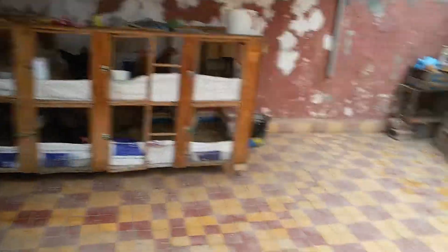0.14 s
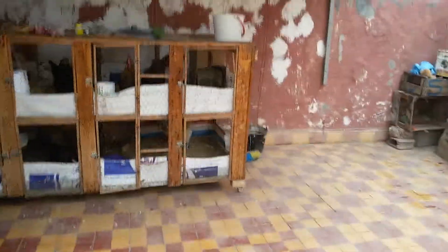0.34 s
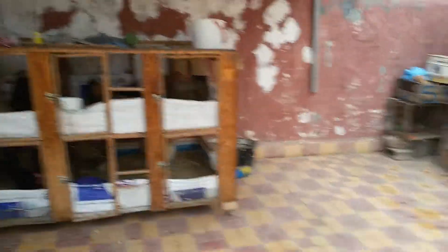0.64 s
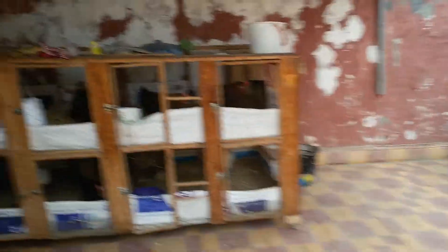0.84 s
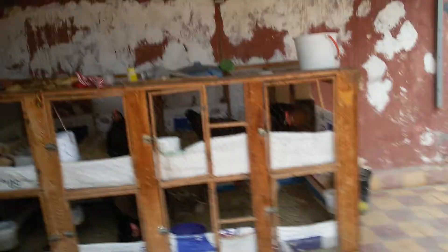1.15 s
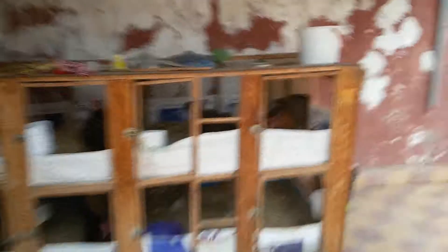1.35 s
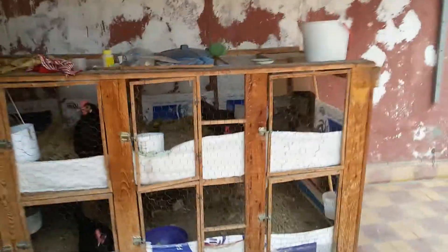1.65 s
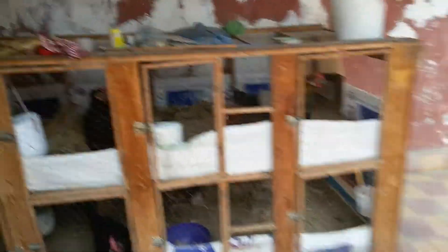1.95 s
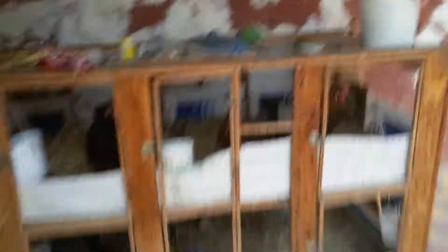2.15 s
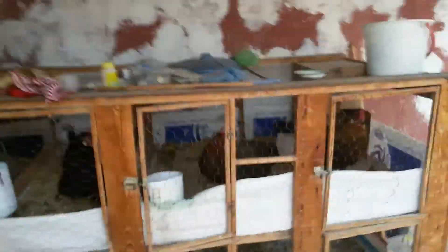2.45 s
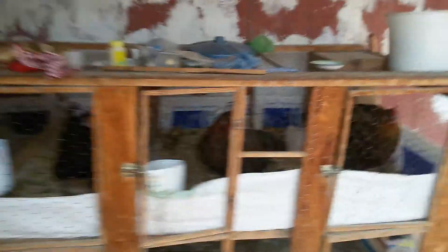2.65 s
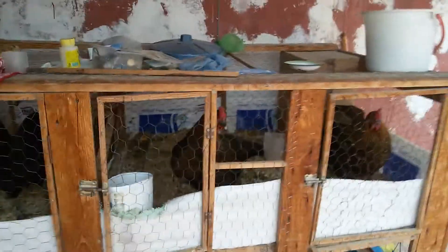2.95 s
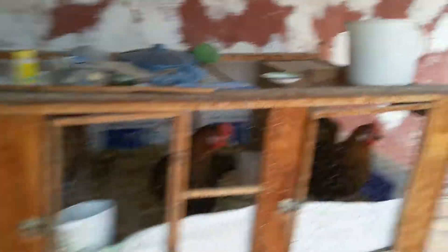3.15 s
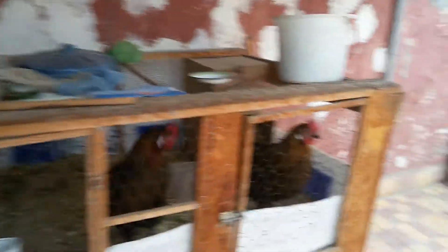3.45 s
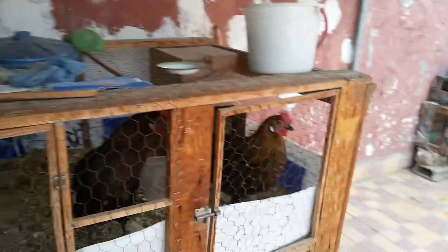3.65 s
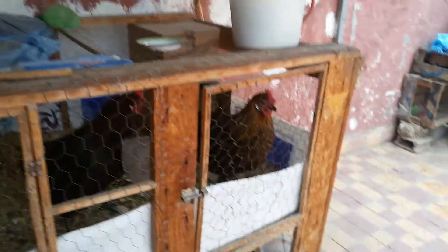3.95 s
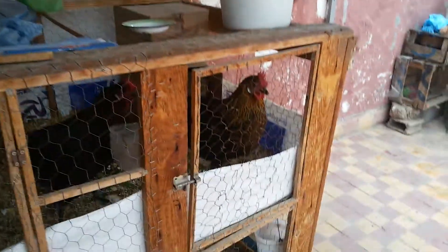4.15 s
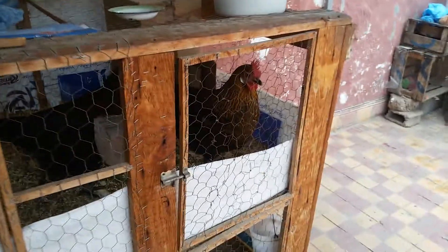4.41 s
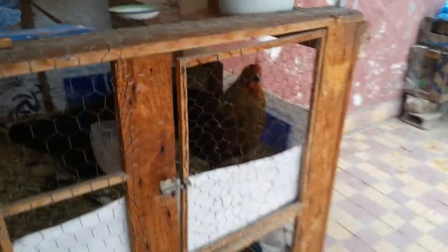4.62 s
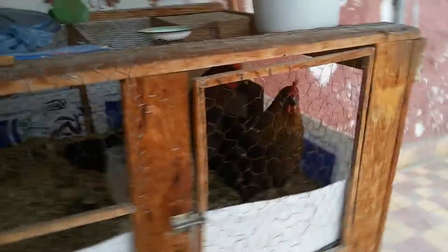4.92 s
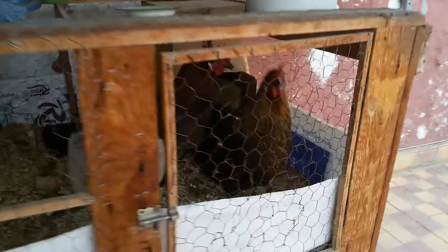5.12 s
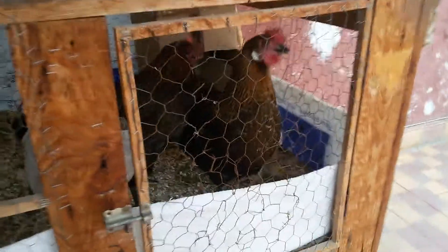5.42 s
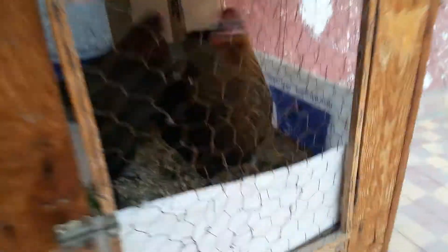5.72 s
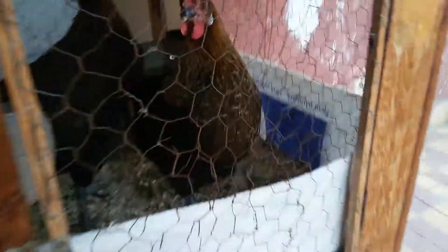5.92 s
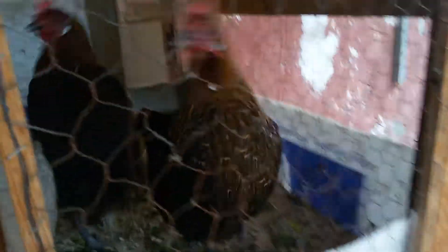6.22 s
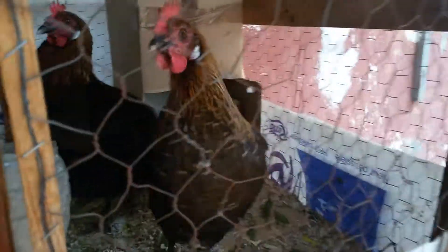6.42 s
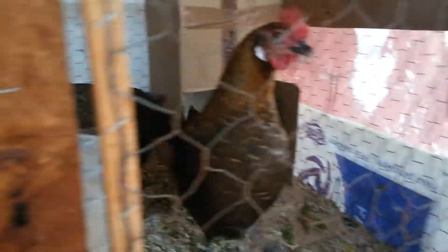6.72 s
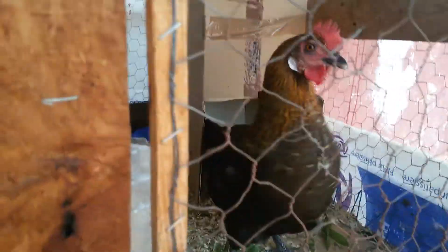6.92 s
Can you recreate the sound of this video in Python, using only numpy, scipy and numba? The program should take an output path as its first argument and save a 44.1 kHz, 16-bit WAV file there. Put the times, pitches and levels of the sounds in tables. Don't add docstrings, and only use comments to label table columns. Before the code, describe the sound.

A hen's nasal, raspy caws repeat about every three quarters of a second, long and short, each sliding upward and growing louder overall. Low throaty mutters and a small hum come midway, with gritty straw scratches, wire ticks and thuds. Short echoes come from boards and yard walls. Behind are a thin wavering tool whine, faint insect chirr and soft traffic rumble.

```python
import sys
import numpy as np
from scipy import signal
from scipy.io import wavfile
from scipy.ndimage import uniform_filter1d
from numba import njit

SR = 44100
rng = np.random.default_rng(int(sys.argv[2]) if len(sys.argv) > 2 else 0)


def digitize_waveform(pressure):
    field = np.atleast_2d(pressure).T
    bounded = np.clip(field, -1, 1)
    quanta = np.round(bounded * 32767).astype(np.int16)
    wavfile.write(sys.argv[1], SR, quanta)


def linear_from_db(decibels):
    return 10 ** (np.asarray(decibels, float) / 20)


N = 311771
T = np.arange(N) / SR


def unit(x):
    return x / np.sqrt(np.mean(x ** 2))


@njit
def svf(x, hz, width):
    y, b, l = np.empty(len(x)), 0., 0.
    for i in range(len(x)):
        g, k = np.tan(np.pi * hz[i] / SR), width / hz[i]
        v = (b + g * (x[i] - l)) / (1 + g * (g + k))
        b, l, y[i] = 2 * v - b, l + 2 * g * v, k * v
    return y


def band(x, hz, width):
    return svf(x, hz + np.zeros(len(x)), 1. * width)


def band_twice(x, hz, width):
    return unit(band(band(x, hz, width), hz, width))


def walk(rate, size=N):
    k = max(int(SR / rate), 1)
    held = np.repeat(rng.standard_normal(size // k + 1), k)
    return 1.4 * uniform_filter1d(uniform_filter1d(held, k), k)[:size]


def span(s, length, rise_s, fall_s):
    at = slice(int(s * SR), int((s + length) * SR))
    t = T[at] - s
    return at, np.clip(np.minimum(t / rise_s, (length - t) / fall_s), 0, 1), t


def unroll(rows, rise_s, fall_s):
    s, *columns = np.transpose(rows)
    at, gate, _ = span(s[0], s[-1] - s[0], rise_s, fall_s)
    return at, gate, [np.interp(T[at], s, c) for c in columns]


def colour(points, hz):
    points = np.array(points)
    return np.interp(np.log(hz), np.log(points[:, 0]), points[:, 1])


def bumps(rows):
    t = T[::32]
    curve = sum(size * np.exp(-(2.74 * (t - s) / length) ** 2) for s, size, length in rows)
    return np.interp(T, t, curve)


def caws(wobble=0.002965, rasp=0.0066, flutter_db=2.0, breath_db=-21):
    # start in seconds, length in seconds, first pitch in Hz, top pitch in Hz,
    # share of the call spent climbing (0 to 1).
    calls = [
        (0.518, 0.56, 520, 536.4, 0.89),
        (1.292, 0.21, 503.5, 537.5, 0.81),
        (2.021, 0.46, 503.5, 617, 0.95),
        (2.796, 0.53, 521.8, 594.8, 1),
        (3.514, 0.2, 551.5, 583, 0.91),
        (4.12, 0.59, 532, 590.4, 0.82),
        (4.96, .358, 538.2, 593.7, .65),
        (5.559, 0.29, 534.6, 578, 0.72),
        (6.149, 0.47, 533, 589.5, 0.55),
    ]
    # 2nd harmonic in dB, fundamental in dB, 3rd-4th in dB, beak ring in dB,
    # swell gained on the climb in dB.
    voices = [(-38.5, -40.5, -44, -58, 6), (-32, -40, -39.5, -49, 12), (-28.5, -34, -40.5, -45, 5.5),
              (-29.5, -36, -36, -45.5, 1.5), (-24.5, -41.5, -30, -39, 8), (-23, -34.5, -29.5, -33, 10.5),
              (-22.5, -31.5, -28.5, -33, 4.5), (-28, -34.5, -28.5, -32, 4), (-21.5, -34, -25, -31, 3)]
    # 4th over 3rd harmonic in dB at first, the same at full effort,
    # half-pitch lines in dB at full effort.
    beaks = [(-13, 0.5, -11), (-11, -10, -11), (-2, -3.5, -12.5), (-6.5, 1, -6), (-1.5, -3, -18),
             (-5, -0.5, -14), (-3, 0.5, -16), (-0.5, 1.5, -15.5), (-0.5, 5, -18.5)]
    # pitch in Hz, level in dB.
    throat = [(500, 1), (1100, -0.5), (1650, -2), (2300, -1.5), (2900, -20), (3250, -12), (3520, -4),
              (3850, 1.5), (4200, -13), (4750, -7.5), (5300, -27), (6500, -23), (8000, -29.5),
              (9800, -25.5)]
    # pitch in Hz, level in dB.
    half_lines = [(800, -15), (1400, 5.5), (2000, -2), (2700, 4), (3700, 8), (5000, 1)]
    # time in seconds, change in dB, length in seconds.
    catches = [(0.557, -19, 0.029), (0.674, 8, 0.13), (0.844, 0, 0.0084), (0.928, -24, 0.01),
               (0.985, -27, 0.044), (1.324, -15, 0.011), (1.448, -15, 0.033), (2.083, -15, 0.01),
               (2.382, -11.5, 0.052), (2.845, -35, .04), (2.93, -6, 0.12), (3.018, 7.5, 0.063),
               (3.098, -3, .035), (3.141, -23, 0.018), (3.545, -24, 0.012), (3.583, 5.5, 0.037),
               (3.598, -17, .014), (4.19, -21, .016), (4.406, 7, 0.13), (4.478, -3, 0.032),
               (4.637, -2, 0.086), (4.999, -19, .014), (5.067, -6.5, 0.096), (5.152, -8, 0.037),
               (5.233, 5, 0.11), (5.795, -24, 0.058), (6.187, -14.5, 0.0067), (6.308, -6.5, 0.13),
               (6.357, -14, 0.029), (6.474, -26, .025)]
    # time in seconds, change in Hz, length in seconds.
    slips = [(.6, -8.5, 0.041), (2.11, 13.5, 0.13), (2.23, -10, 0.078), (2.365, -16.5, 0.058),
             (2.89, -9.5, 0.15), (3.07, 14.5, 0.052), (3.3, 38.5, 0.024), (3.54, -14.5, .04),
             (3.576, 13, 0.038), (3.706, 39, 0.022), (4.155, -12, 0.043), (4.46, -12, .08), (4.53, 5, .06),
             (5.18, 8, 0.029), (5.795, -9.5, 0.032), (6.476, -16.5, 0.026)]
    catch_share = 0.19
    out = np.zeros(N)
    catch_db, slip_hz = bumps(catches), bumps(slips)
    for (s, length, *pitch), voice, beak in zip(calls, voices, beaks):
        at, gate, t = span(s - .004, length + 0.0037, rise_s=0.0093, fall_s=0.027)
        hz, db, low_db, mid_db, beak_db, open_db, half_db = effort(t, length, *pitch, voice, beak)
        low_db = low_db + catch_share * catch_db[at]
        mid_db = mid_db + catch_share * catch_db[at]
        lines_db = {1: low_db, 2: db + catch_db[at], 3: mid_db - open_db / 2, 4: mid_db + open_db / 2}
        size = len(gate)
        unsteady = 1 + wobble * walk(51.45, size) + rasp * walk(250.5, size)
        phase = 2 * np.pi * np.cumsum((hz + slip_hz[at]) * unsteady) / SR
        call = 0
        for k in np.arange(2, 35) / 2:
            line_db = lines_db.get(k, mid_db if k < 5 else beak_db) + colour(throat, k * hz)
            if k % 1:
                line_db = line_db + half_db + colour(half_lines, k * hz)
            flicker_db = flutter_db * (k != 2) * walk(35, size)
            flicker_db = flicker_db + np.clip(.8 * (k - 3), 1.2, 2.6) * walk(110, size)
            line = np.sqrt(2) * np.cos(k * phase + 1.2 * rng.standard_normal())
            call = call - linear_from_db(line_db + flicker_db) * line
        air = rng.standard_normal(size) * (1 + np.cos(phase))
        breath = linear_from_db(breath_db + db) * unit(band(air, 1330, 510))
        beak_air = band_twice(air, 4200, 1600) + linear_from_db(-7) * unit(band(air, 7200, 3500))
        out[at] += gate * (call + breath + linear_from_db(beak_db - 6) * beak_air)
    return out


def effort(t, length, first_hz, top_hz, climb, voice, beak):
    swell_shares = (.6, 0.74, 0.85, 1.06)
    full_db, low_db, mid_db, beak_db, swell_db = voice
    first_open_db, open_db, half_db = beak
    push = np.clip(t / (climb * length), 0, 1)
    sharp_hz = 59 * np.exp(-t / 0.00559)
    sag_hz = 15.4 * np.exp((t - length) / 0.012)
    hz = first_hz + (top_hz - first_hz) * push + sharp_hz - sag_hz
    low, full, mid, ring = (-share * swell_db * (1 - push) for share in swell_shares)
    coop_hz, coop_width_hz, coop_db = 1214, 78, 6
    coop_boost = coop_db * np.exp(-((2 * hz - coop_hz) / coop_width_hz) ** 2)
    hard_db = 7 * np.exp(-t / 0.03)
    ring_db = beak_db + ring + 3.5 * np.exp(-t / 0.055)
    open_db = first_open_db + (open_db - first_open_db) * push
    open_db = open_db + 6 * np.exp(-t / 0.088) + 7.5 * walk(24.84, len(t))
    half_db = half_db - 4.5 * (1 - push) + 1.5 * walk(5.6, len(t))
    return hz, full_db + full + coop_boost + hard_db, low_db + low, mid_db + mid, ring_db, open_db, half_db


def grumbles(throat_width=330):
    # start in seconds, length in seconds, first pitch in Hz, last pitch in Hz, level in dB.
    mutters = [(0.291, 0.095, 259.7, 274, -43), (1.281, 0.15, 230.7, 229.6, -41),
               (1.435, 0.15, 258, 268.5, -36.5), (1.654, 0.071, 233, 281, -37),
               (1.83, 0.11, 230, 275, -38.5), (2.841, 0.34, 238.6, 266.8, -40),
               (3.243, 0.12, 271, 297.7, -30), (3.33, 0.21, 314, 300, -30), (3.516, .16, 250, 275.4, -33),
               (3.755, 0.15, 223.5, 309, -32), (3.892, .08, 319.4, 388, -34.5)]
    out = np.zeros(N)
    for s, length, first_hz, last_hz, db in mutters:
        at, gate, t = span(s, length, rise_s=0.006, fall_s=0.024)
        hz = first_hz + (last_hz - first_hz) * t / length
        throat_hz = 472 + 1.036 * hz
        rough = np.clip(.42 - .65 * np.log2(last_hz / first_hz), .05, 1)
        size = len(gate)
        cycles = np.cumsum(hz * (1 + 0.11 * rough * walk(120, size))) / SR
        pulses = np.exp(-(cycles % 1) / .12) * linear_from_db(4 * rough * walk(70, size))
        breath = unit(pulses * rng.standard_normal(size))
        source = unit(pulses - pulses.mean()) + 2.5 * rough * breath
        voice = band_twice(source, throat_hz, throat_width)
        chest = linear_from_db(-4 - 17 * rough) * band_twice(source, hz, 90)
        out[at] += gate * linear_from_db(db) * (voice + chest)
    return out


def hum():
    # time in seconds, pitch in Hz, level in dB.
    glide = [
        (2.96, 496, -40),
        (2.99, 486, -39.5),
        (3.134, 481, -40.5),
        (3.19, 501, -43),
        (3.244, 526, -36.5),
        (3.3, 515, -35),
    ]
    throat_hz, octave_db, fall_db_per_hz = 968, 1.5, .28
    out = np.zeros(N)
    at, gate, (hz, low_db) = unroll(glide, rise_s=.02, fall_s=.03)
    high_db = low_db + octave_db - fall_db_per_hz * np.abs(2 * hz - throat_hz)
    phase = 2 * np.pi * np.cumsum(hz) / SR
    out[at] = gate * np.sqrt(2) * (linear_from_db(low_db) * np.sin(phase) + linear_from_db(high_db) * np.sin(2 * phase))
    return out


def litter():
    # middle in seconds, level in dB, length in seconds, centre in Hz.
    scratches = [(0.278, -38.5, 0.031, 4700), (0.326, -44, 0.035, 4800), (0.38, -32, 0.0028, 3820),
                 (0.653, -47, 0.024, 5500), (0.916, -42.5, 0.059, 4193), (1.017, -41, .015, 4800),
                 (1.202, -41, 0.015, 4300), (1.457, -42, 0.02, 4020), (1.688, -40.5, 0.1, 4360),
                 (1.92, -37.5, 0.052, 4300), (2.368, -42, 0.01, 4500), (2.642, -50, 0.058, 4940),
                 (2.881, -30.5, 0.044, 4100), (2.942, -34, 0.0091, 4000), (3.084, -54, 0.013, 4200),
                 (3.232, -30.5, 0.029, 4000), (3.665, -37, 0.011, 4500), (3.96, -41.5, 0.05, 4530),
                 (4.305, -35, 0.024, 4170), (5.443, -43.5, 0.049, 4250), (5.718, -30.5, 0.047, 4340),
                 (5.773, -30, 0.065, 4160), (6.3, -37.5, 0.16, 5200), (6.783, -34, 0.016, 4860),
                 (6.812, -34.5, 0.028, 4560), (6.847, -44, 0.061, 4660)]
    # start in seconds, peak in dB, low part in dB beside it, top part in dB beside it.
    ticks = [
        (0.5934, -32, 13.5, -22),
        (2.617, -36, 0, -40),
        (6.0302, -23.5, -6, -34),
        (6.3446, -22, -11, -25),
        (7.002, -27.5, -19, -25),
    ]
    # start in seconds, level in dB, pitch in Hz, time to fade 60 dB in seconds.
    thuds = [
        (2.918, -29, 96.5, 0.25),
        (3.944, -17, 198, 0.042),
        (6.31, -21.5, 223, 0.028),
    ]
    # middle in seconds, level in dB, length in seconds.
    chirrs = [
        (0.055, -41, 0.17),
        (1.354, -40.5, 0.48),
        (2.886, -33, 0.046),
        (5.417, -42, 0.3),
        (6.8, -32.5, 0.069),
    ]
    out = np.zeros(N)
    grit = rng.standard_normal(N) * linear_from_db(2.7 * walk(400))
    for s, db, length, hz in scratches:
        at = slice(int((s - 2 * length) * SR), int((s + 2 * length) * SR))
        swell = np.exp(-(2 * (T[at] - s) / length) ** 2)
        out[at] += linear_from_db(db) * swell * band_twice(grit[at], hz, 3200)
    t = T[:4000]
    for s, db, low_db, top_db in ticks:
        snap = rng.standard_normal(len(t)) * (np.exp(-t / 0.0046) + 0.12 * np.exp(-t / 0.035))
        tick = band(snap, 2140, 4400) + linear_from_db(low_db) * band(snap, 710, 900)
        tick = tick + linear_from_db(top_db + 34) * band(snap, 13000, 4000)
        start = int(s * SR)
        out[start:][:len(t)] += (linear_from_db(db) * tick)[:N - start]
    for s, db, hz, t60 in thuds:
        thud = np.sin(2 * np.pi * hz * t) * (1 - np.exp(-t / 0.0013))
        out[int(s * SR):][:len(t)] += linear_from_db(db - 60 * t / t60) * thud
    chirr = band_twice(rng.standard_normal(N), 13000, 2400)
    return out + chirr * sum(linear_from_db(db) * np.exp(-(2 * (T - s) / length) ** 4) for s, db, length in chirrs)


def yard(x):
    t = T[:SR // 2]
    # centre in Hz, width in Hz, level in dB, time to fade 60 dB in seconds.
    walls, tiles, coop = (1050, 710, 0, 0.2), (3600, 1700, -12.5, 0.24), (1185, 200, -13, .55)
    tail = 0
    for hz, width, db, t60 in (walls, tiles, coop):
        tail = tail + band(rng.standard_normal(len(t)), hz, width) * linear_from_db(db - 60 * t / t60)
    tail = tail * (1 - np.exp(-t / 0.0087))
    return signal.fftconvolve(x, linear_from_db(-20) * tail / np.sqrt(np.sum(tail ** 2)))[:N]


def tool():
    # time in seconds, whine pitch in Hz, level in dB.
    whine = [(0, 4900, -43.5), (.25, 4830, -42.5), (.35, 4584, -41.5), (.67, 4400, -49.5), (1, 4420, -42),
             (1.38, 4610, -42.5), (1.9, 4980, -40), (2.15, 4890, -44), (2.6, 5130, -40.5),
             (3.1, 5140, -38.5), (4.1, 5030, -41.5), (4.4, 4930, -51), (4.85, 4610, -47.5),
             (5.5, 4510, -57), (5.93, 4440, -51.5), (6.14, 4900, -50.5), (6.7, 4980, -51.5),
             (7.07, 4840, -56.5)]
    _, _, (hz, db) = unroll(whine, rise_s=.001, fall_s=.001)
    hz, db = (np.pad(c, (0, N - len(c)), "edge") for c in (hz, db))
    core = band_twice(rng.standard_normal(N), hz, 180)
    cut = unit(band(rng.standard_normal(N), hz, 950))
    upper_hz = 1.075 * hz + 180 * (T > 2)
    upper = band_twice(rng.standard_normal(N), upper_hz, 280)
    upper = upper * (.7 * np.exp(-(T / .35) ** 4) + np.exp(-((T - 4.85) / .5) ** 2))
    return linear_from_db(db + 2.0 * walk(25.53)) * (linear_from_db(2.5) * core + linear_from_db(-11.5) * cut + linear_from_db(2.5) * upper)


def town():
    # pitch in Hz, level in dB per Hz.
    tone = [(25, -23), (40, -13.5), (59, 8.5), (85, -5.5), (125, -2), (200, -8), (450, -16.5), (800, -16.5),
            (1200, -17), (2500, -25), (3500, -25.5), (5000, -15.5), (6500, -47), (9000, -42)]
    # time in seconds, traffic level in dB.
    traffic = [
        (0, -48.5),
        (.31, -42),
        (3.5, -42.5),
        (4.6, -45),
        (6.2, -48.5),
        (7.07, -46.5),
    ]
    mean_db = -44
    swell_db = np.interp(T, *np.transpose(traffic)) - mean_db
    parts = np.zeros((3, N))
    for hz in 28 * 2 ** np.arange(0, 8.6, 1 / 3):
        part = np.searchsorted([75, 330], hz)
        flicker_db = np.clip(4.2 - 0.45 * np.log2(hz / 60), 1.5, 3.5) * walk(7.3)
        noise = band(band(rng.standard_normal(N), hz, hz / 3), hz, hz / 3)
        parts[part] += linear_from_db(colour(tone, hz) + flicker_db) * noise
    rumble, drone, hiss = (unit(part) for part in parts)
    return (rumble * linear_from_db(-43.5 + 1.4 * swell_db) + drone * linear_from_db(-42 + 0.2 * swell_db)
            + hiss * linear_from_db(-42.5 + 0.56 * swell_db))


def scene():
    hens = caws() + grumbles() + hum() + litter()
    return (hens + yard(hens) + tool() + town())[None]


def band_limit(x):
    return signal.sosfilt(signal.butter(12, 14700, fs=SR, output="sos"), x)


def record(dry):
    dull = signal.sosfilt(signal.butter(3, 7000, fs=SR, output="sos"), dry)
    heard = dull + linear_from_db(-54) * rng.standard_normal(dry.shape)
    return band_limit(heard)


dry = scene()
out = record(dry)
digitize_waveform(out)
```